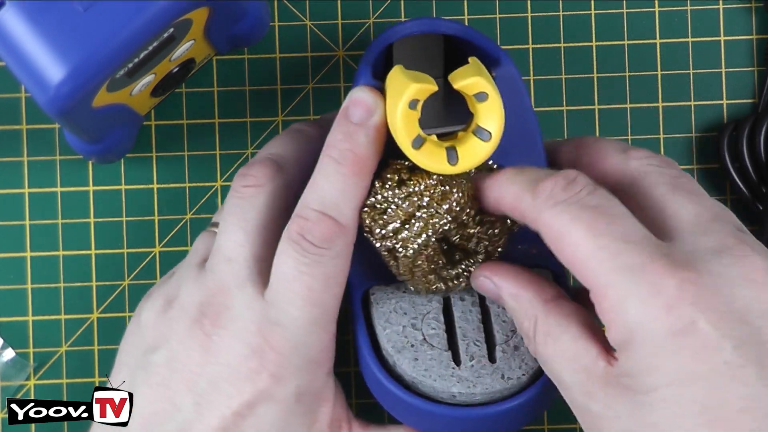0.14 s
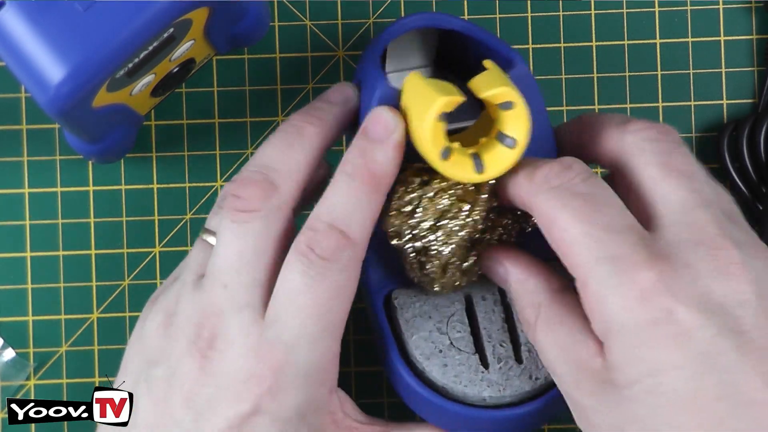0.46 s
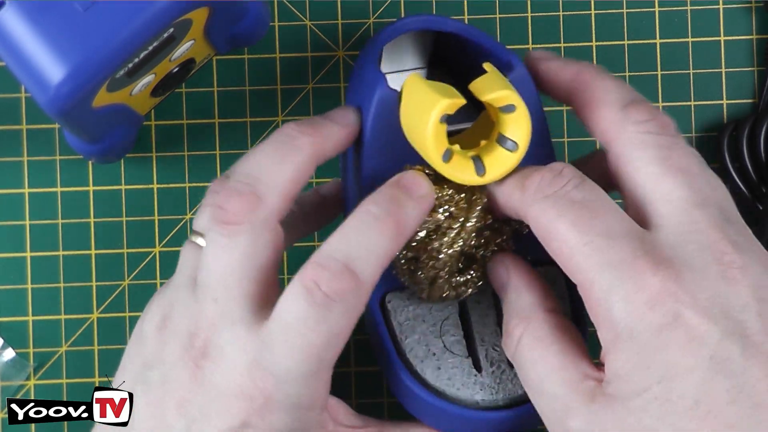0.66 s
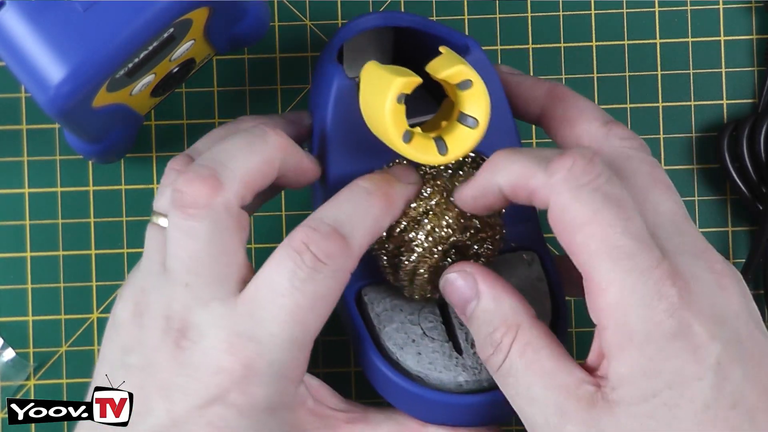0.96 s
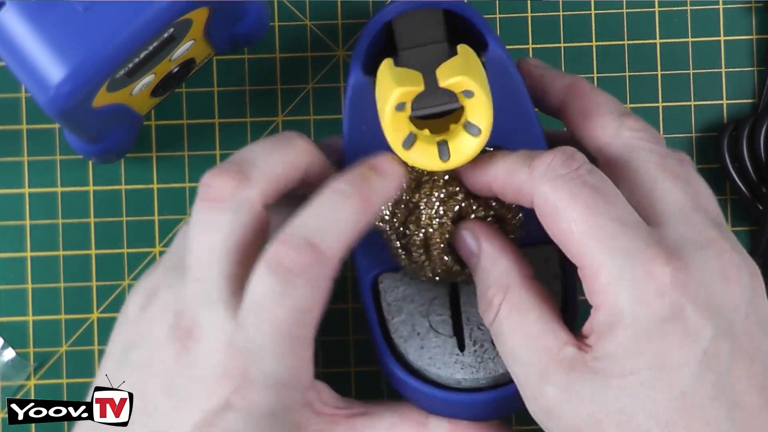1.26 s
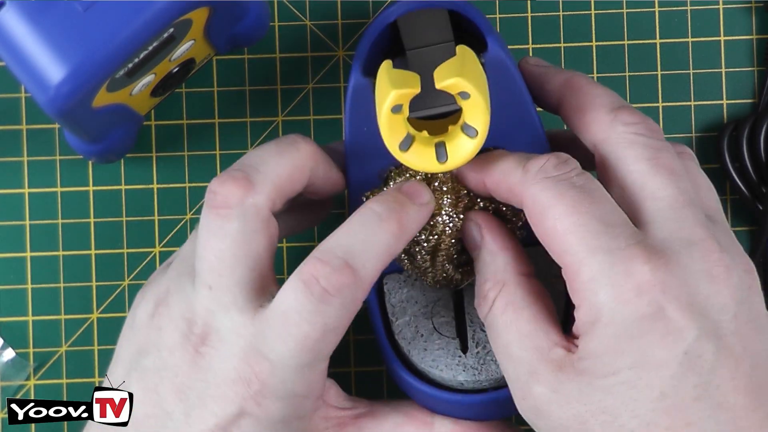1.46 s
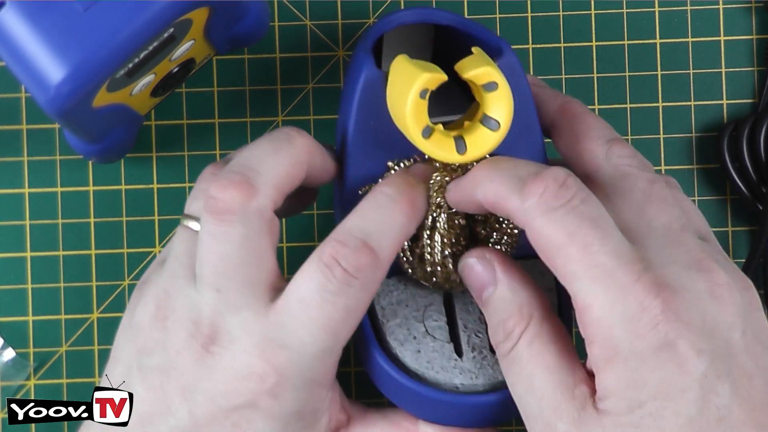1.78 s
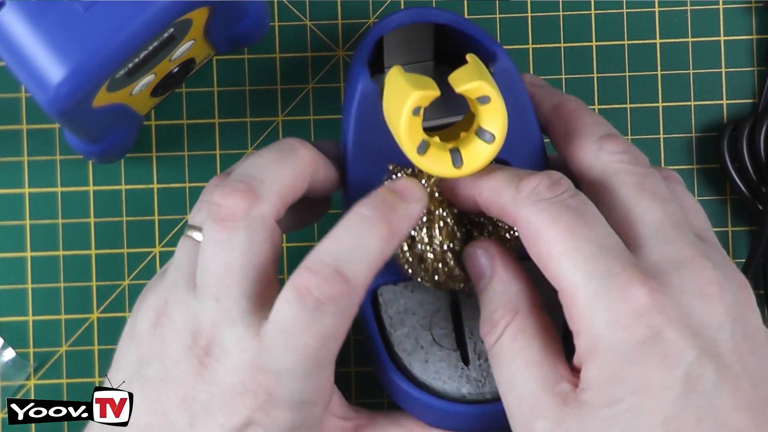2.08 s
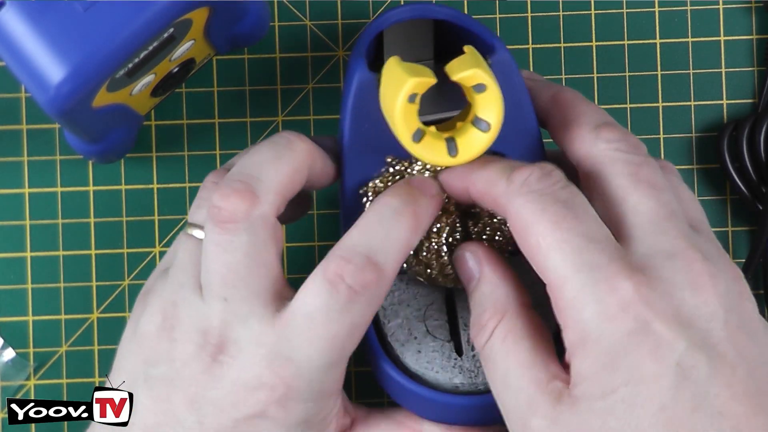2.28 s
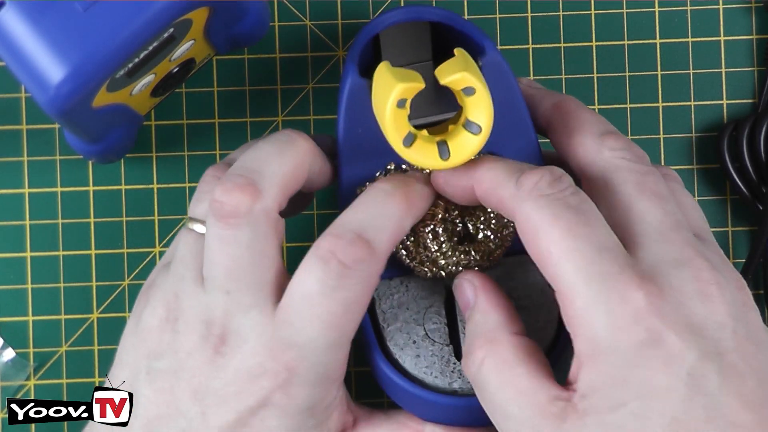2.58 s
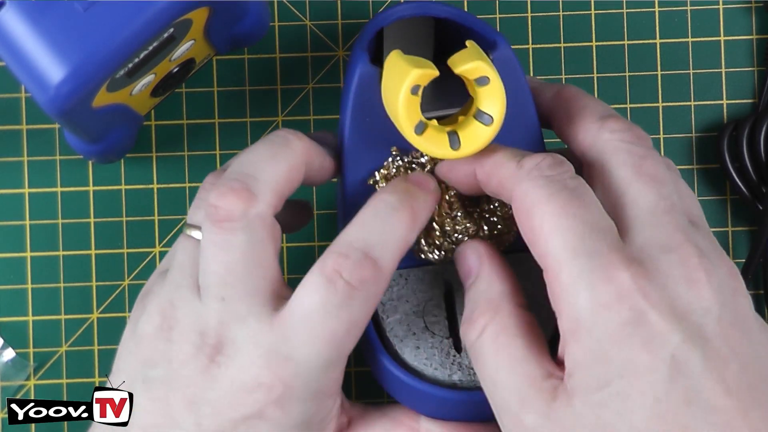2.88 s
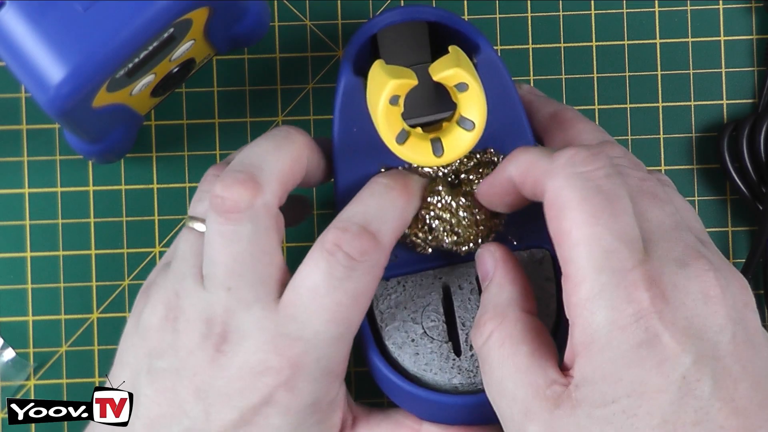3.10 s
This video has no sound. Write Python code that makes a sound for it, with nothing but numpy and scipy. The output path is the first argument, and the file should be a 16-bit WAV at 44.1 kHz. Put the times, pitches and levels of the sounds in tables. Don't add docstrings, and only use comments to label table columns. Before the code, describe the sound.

Scratchy, crackling wire wool pushed into a holder, with small snaps, soft knocks and low bench rumble

```python
import sys
import numpy as np
from scipy import signal
from scipy.fft import rfft, irfft
from scipy.io import wavfile
from scipy.ndimage import uniform_filter1d

SR = 44100
rng = np.random.default_rng(int(sys.argv[2]) if len(sys.argv) > 2 else 0)


def wav_record(signal):
    frames = np.transpose(np.atleast_2d(signal))
    bounded = np.clip(frames, -1, 1)
    quanta = np.round(bounded * 32767).astype(np.int16)
    wavfile.write(sys.argv[1], SR, quanta)


def boost_factor(decibels):
    exponent = np.asarray(decibels, float) / 20
    return 10 ** exponent


N = 143325


def unit(x):
    return x / np.sqrt(np.mean(x ** 2))


def ring(x, hz, width_hz):
    return signal.lfilter(*signal.iirpeak(min(hz, .45 * SR), hz / width_hz, fs=SR), x)


def highpass(hz):
    return signal.butter(2, hz, "high", fs=SR, output="sos")


def colour(x, table):
    hz, db = np.array(table, float).T
    grid_hz = np.arange(4097) * SR / 8192
    db = np.interp(np.log(grid_hz + 1), np.log(hz), np.maximum(db, -90))
    cepstrum = irfft(db * np.log(10) / 20)
    cepstrum[1:4096] *= 2
    cepstrum[4097:] = 0
    impulse = irfft(np.exp(rfft(cepstrum)))[:4096]
    return signal.fftconvolve(x, impulse)[:N]


def walk(rate_hz):
    k = int(SR / rate_hz)
    steps = np.clip(rng.standard_normal(N // k + 3), -1.6, 1.6)
    smooth = uniform_filter1d(uniform_filter1d(np.repeat(steps, k), k), k)
    return 1.4 * smooth[k:N + k]


def swells(table):
    t, power = np.arange(N) / SR, 0
    for at, rise, fall, db in table:
        width = np.where(t < at, rise, fall)
        power = power + boost_factor(db) ** 2 * np.exp(-((t - at) / width) ** 2 * 2)
    return np.sqrt(power)


def ticks(rate_hz, spread_db):
    pick, size, sign = rng.random(N), rng.exponential(size=N), rng.standard_normal(N)
    return unit((pick < rate_hz / SR) * boost_factor(spread_db * size) * sign)


def body(x, mode_hz, modes, wander_db, rate_hz):
    out = 0
    for k, (hz, (width_hz, db)) in enumerate(zip(mode_hz, modes)):
        drive = x * boost_factor(db + wander_db * walk(rate_hz))
        out = out + (-1) ** k * ring(drive, hz, width_hz) / np.sqrt(width_hz)
    return out


def wool():
    # peak in seconds, rise in seconds, fall in seconds, level in dB.
    squeezes = [(.03, 0.021, 0.018, -65), (.18, 0.011, 0.062, -64.5), (.32, 0.078, 0.09, -43),
                (.47, 0.078, 0.036, -48.5), (.65, 0.15, 0.05, -55), (.83, 0.098, 0.082, -54),
                (.915, 0.079, 0.064, -52.5), (1.095, 0.022, 0.03, -45), (1.235, 0.02, 0.082, -40.5),
                (1.285, 0.015, 0.02, -43.5), (1.33, 0.023, 0.022, -36.5), (1.42, 0.012, 0.01, -47.5),
                (1.46, 0.024, 0.053, -51), (1.6, 0.036, 0.12, -50), (1.7, 0.026, 0.026, -47),
                (1.915, 0.016, 0.036, -46.5), (1.98, 0.038, 0.022, -53.5), (2.065, 0.077, 0.039, -46.5),
                (2.19, 0.061, 0.011, -46.5), (2.24, 0.04, 0.059, -46.5), (2.38, 0.041, 0.044, -47.5),
                (2.44, 0.038, 0.036, -43.5), (2.54, 0.025, 0.044, -46.5), (2.67, 0.054, 0.025, -48),
                (2.695, 0.0088, 0.012, -40.5), (2.721, 0.018, 0.019, -37), (2.92, 0.05, 0.032, -55.5),
                (2.98, 0.02, 0.025, -43.5), (3.035, 0.057, 0.058, -41), (3.18, 0.032, 0.073, -50.5),
                (3.235, 0.02, 0.047, -45)]
    # frequency in Hz, density in dB per Hz.
    wire_colour = [(450, -40), (800, -6.5), (1800, 2), (3300, -7.5), (7500, -1.5), (9800, -11),
                   (11500, -3.5), (16000, -4)]
    cup_hz = [1710, 2085, 2330, 2725, 4135, 3960, 5510, 6300, 7100, 7850, 8230, 9150, 10800, 12300]
    # width in Hz, level in dB.
    cup_modes = [(60, -12.5), (32, -8), (50, -14.5), (40, -6), (50, -2.5), (60, -10), (45, -5), (60, -6),
                 (50, -4), (90, -15), (80, -9), (70, -6), (50, -7), (80, -11)]
    cup_db, cup_wander_db, coils_db, rest_db = -1, 4, -17.5, -62.5

    slips = ticks(9000, 1.9) * boost_factor(1.8 * walk(70))
    effort = np.hypot(swells(squeezes), boost_factor(rest_db))
    drive = slips * effort
    cracks = wire_snaps()
    wire_gain = np.std(colour(slips, wire_colour))
    cup = body(drive + 0.3 * cracks, cup_hz, cup_modes, cup_wander_db, 16)
    wire_drive = drive + boost_factor(coils_db) * 40 * coils(drive + 0.13 * cracks)
    wires = patchy(colour(wire_drive, wire_colour)) / wire_gain
    sound = outer_wires(wires + 0.42 * cracks + boost_factor(cup_db) * 45 * cup)
    return sound + press_thud(slips * np.sqrt(effort) * boost_factor(-23.5))


def wire_snaps():
    # start in seconds, peak in dB, brightness in Hz.
    snaps = [(0.235, -32, 7000), (0.5524, -39, 7000), (.872, -32, 9000), (0.976, -25, 8300),
             (1.0899, -29, 10000), (1.2206, -34, 4100), (1.24, -23, 7000), (1.5724, -34, 4000),
             (1.911, -39, 6000), (2.1155, -29, 7500), (2.367, -34, 7000), (2.7667, -38, 7000),
             (2.786, -36, 7300), (2.7983, -30, 7300), (2.8747, -28.5, 7100), (2.948, -34, 7250),
             (2.9682, -33, 4520), (3.129, -19.5, 3820), (3.2225, -31, 5440)]
    rebound_s, rebound_db, tail_s, tail_db = 0.0016, 0.5, 0.0039, -8
    cracks, t = np.zeros(N), np.arange(2000) / SR
    late = np.maximum(t - rebound_s, 0)
    shape = np.exp(-t / 0.0017)
    shape = shape + boost_factor(rebound_db) * (late > 0) * np.exp(-late / 0.00091)
    shape = shape + boost_factor(tail_db) * np.exp(-t / tail_s)
    for at, db, hz in snaps:
        i = int(at * SR)
        noise = rng.standard_normal(2000)
        crack = ring(ring(noise * shape, hz, 0.87 * hz), hz, 2.0015 * hz)
        cracks[i:i + 2000] += (boost_factor(db) * crack)[:N - i]
    return cracks


def coils(x):
    hz = 4500 * 3.3 ** ((np.arange(30) + rng.random(30)) / 30)
    width_hz, wander_db = 160, 7
    return body(x, hz, [(width_hz, 0)] * len(hz), wander_db, 11)


def patchy(x):
    flicker_db, lows = 2.5, [0]
    for edge_hz in [700, 1400, 2500, 4000, 6000, 8500, 11500]:
        lows.append(signal.sosfiltfilt(signal.butter(2, edge_hz, fs=SR, output="sos"), x))
    lows.append(x)
    return sum((b - a) * boost_factor(flicker_db * walk(20.99)) for a, b in zip(lows, lows[1:]))


def outer_wires(x):
    # time in seconds, treble gain in dB.
    treble = [(0, -22), (.15, -8), (.5, -2.5), (.95, 0.5), (1.18, 0.5), (1.31, -17), (1.5, -1.5),
              (1.85, -3), (2.05, -2.5), (3.1, -3.5), (3.25, -2)]
    top = signal.sosfiltfilt(highpass(9000), x)
    gain_db = np.interp(np.arange(N) / SR, *np.array(treble).T)
    return x + top * (boost_factor(gain_db) - 1)


def press_thud(push):
    low_hz, thud_db = 104.3, 3.5
    low = ring(ring(push, low_hz, 34.6), low_hz, 57)
    high = ring(ring(push, 166.2, 37), 159.4, 49)
    return boost_factor(thud_db) * (15 * low + 9 * high)


def scratch_rings(table):
    narrowest_hz, blur, fade = 37, 1.6, 1.05
    out, t = np.zeros(N + 6000), np.arange(6000) / SR
    for at, length, hz, db in table:
        width_hz = narrowest_hz + blur / length
        noise = rng.standard_normal(6000) * np.exp(-fade * t / length - (t / length) ** 4)
        burst = ring(ring(noise, hz, width_hz), hz, 2 * width_hz)
        out[int(at * SR):][:6000] += boost_factor(db) * burst * np.sqrt(SR / width_hz / np.pi)
    return out[:N]


def catches_and_jolts():
    # start in seconds, length in seconds, frequency in Hz, level in dB.
    caught = [(1.8275, 0.0048, 1000, -45), (3.02, .07, 1150, -47), (0.189, .01, 7650, -53),
              (0.27, .02, 4200, -51), (.283, 0.045, 1840, -48), (.328, .02, 4100, -42),
              (0.33, 0.0086, 7099, -42), (.335, .04, 7800, -45), (1.567, 0.005, 1290, -46.5),
              (0.459, .018, 4135, -50), (.465, 0.013, 12000, -56.5), (0.55, 0.014, 7240, -51),
              (1.275, 0.065, 673, -35), (0.87, .008, 7150, -50), (0.974, 0.023, 10580, -45.5),
              (1.088, .03, 10700, -43), (1.131, 0.051, 5560, -52), (1.124, 0.056, 2740, -56.5),
              (1.2195, 0.015, 4200, -37), (1.2396, 0.011, 7120, -42.5), (1.241, .01, 8000, -43),
              (1.26, 0.087, 2745, -43), (1.262, 0.053, 908, -31.5), (1.268, 0.041, 5930, -45),
              (1.314, 0.031, 6350, -37), (1.336, .024, 4080, -38), (1.328, 0.041, 1710, -39.5),
              (1.4107, 0.011, 7100, -53), (1.4416, .012, 7200, -49), (1.592, 0.029, 7100, -48.5),
              (1.637, 0.023, 4120, -47), (1.9679, .015, 4170, -48), (2.1146, .011, 4200, -39),
              (1.922, 0.017, 6300, -57), (2.02, 0.03, 7630, -48), (2.3665, .012, 6960, -45),
              (2.369, 0.048, 2030, -61), (2.6469, .008, 7710, -46), (2.6893, 0.017, 4130, -46.5),
              (2.717, 0.012, 7100, -34.5), (2.713, 0.018, 2610, -43.5), (2.7841, .006, 7150, -40),
              (2.796, .006, 7220, -43.5), (2.874, 0.0059, 7100, -40), (2.9487, .006, 7100, -45),
              (2.9682, .01, 4020, -39.5), (3.0, 0.028, 7050, -45), (3.189, 0.03, 4080, -48.5),
              (3.198, 0.046, 12200, -52), (3.195, 0.046, 10870, -53)]
    return scratch_rings(caught)


def holder():
    # peak in seconds, rise in seconds, fall in seconds, level in dB.
    drags = [(.11, 0.013, 0.042, -58.5), (.3, 0.086, 0.034, -46.5), (.365, 0.045, 0.076, -44),
             (.53, 0.081, 0.03, -39.5), (.68, 0.049, 0.056, -48.5), (.78, 0.038, 0.03, -43),
             (.83, 0.029, 0.047, -28.5), (.9, 0.027, 0.031, -35.5), (.985, 0.013, 0.015, -42.5),
             (1.095, 0.014, 0.049, -44), (1.226, 0.0047, 0.017, -29), (1.248, 0.016, 0.025, -25),
             (1.28, 0.011, 0.038, -28), (1.32, 0.081, 0.031, -30), (1.46, 0.1, 0.024, -53.5),
             (1.582, 0.013, 0.022, -36), (1.62, 0.042, 0.039, -31.5), (1.715, 0.045, 0.037, -33),
             (1.805, 0.022, 0.014, -40), (1.92, 0.035, 0.032, -44), (2.04, 0.036, 0.043, -45.5),
             (2.11, .03, .03, -45), (2.45, 0.15, 0.3, -52.5), (2.71, 0.032, 0.045, -42.5),
             (2.89, 0.034, 0.034, -54.5), (3.05, 0.065, 0.054, -44.5), (3.19, 0.081, 0.053, -50)]
    bench_hz = [168, 210, 276, 348, 424, 480, 532, 655, 815, 928, 1009, 1250, 1750, 2210]
    # width in Hz, level in dB.
    bench_modes = [(17, -4), (20, 3), (28, -8), (29, -2), (29, -4), (35, -8), (32, -8), (36, -10),
                   (54, -16), (59, -12), (43, -14), (200, -14), (500, -18), (60, -21)]
    bench_wander_db, scrape_hz, scrape_db = 1.17, 3060, -18.5
    drive = ticks(3000, 1.0) * boost_factor(1.3 * walk(50)) * swells(drags)
    drum = body(drive, bench_hz, bench_modes, bench_wander_db, 9.98)
    scrape = ring(ring(drive, scrape_hz, 3400), scrape_hz, 4400)
    return 70 * signal.sosfilt(highpass(150), drum) + boost_factor(scrape_db) * scrape


def shell_taps():
    # start in seconds, frequency in Hz, level in dB.
    taps = [
        (.14, 1960, -48.5),
        (1.089, 1010, -38.5),
        (1.785, 1300, -44),
        (1.826, 885, -50),
        (1.911, 1720, -35.5),
    ]
    t60_s, out, t = 0.062, np.zeros(N), np.arange(N) / SR
    for at, hz, db in taps:
        u = np.maximum(t - at, 0)
        knock = (1 - np.exp(-u / 0.0022)) * boost_factor(-60 * u / t60_s) * rng.standard_normal(N)
        out = out + boost_factor(db) * 7 * ring(knock, hz, .16 * hz)
    return out


def bench_jolts():
    # start in seconds, length in seconds, frequency in Hz, level in dB.
    jolts = [
        (.975, 0.023, 125, -36),
        (1.1, 0.07, 165, -46.5),
        (1.79, .035, 190, -36),
        (2.225, 0.032, 335, -48),
    ]
    return scratch_rings(jolts)


def bench_wobble():
    # peak in seconds, rise in seconds, fall in seconds, level in dB.
    rocking = [(.15, 0.043, 0.085, -40.5), (.33, 0.067, 0.045, -35.5), (.5, 0.12, 0.056, -36),
               (.9, 0.23, 0.11, -36), (1.23, 0.096, 0.096, -29), (1.41, 0.046, 0.042, -34.5),
               (1.78, 0.18, 0.13, -31), (2.03, 0.14, 0.22, -28.5), (2.5, 0.11, 0.13, -34),
               (2.82, 0.18, 0.16, -28), (3.1, 0.12, 0.12, -39)]
    wobble_hz = 25.2 * (1 + 0.0402 * walk(2.5))
    phase = 2 * np.pi * np.cumsum(wobble_hz) / SR
    return np.sqrt(2) * swells(rocking) * np.sin(phase)


def low_hum():
    hum_hz, hum_db = 90.6, -53
    phase = 2 * np.pi * hum_hz * np.arange(N) / SR + 0.19 * walk(5.97)
    return np.sqrt(2) * boost_factor(hum_db + 1.4 * walk(11)) * np.sin(phase)


def room_hiss():
    # frequency in Hz, density in dB per Hz.
    hiss_colour = [(24, -6.5), (40, -3), (491, -27.5), (615, -39.5), (1520, -29.5), (3740, -47.5),
                   (4130, -53), (14100, -49), (16000, -56)]
    return boost_factor(-50.5) * unit(colour(rng.standard_normal(N), hiss_colour))


def room_echo(near):
    echo_db, t60_s, t = -7, 0.22, np.arange(8000) / SR
    tail = rng.standard_normal(8000) * boost_factor(-60 * t / t60_s) * (t > .003)
    bright = signal.lfilter(*signal.butter(2, 450, "high", fs=SR), near)
    return boost_factor(echo_db) * signal.fftconvolve(bright, tail / np.linalg.norm(tail))[:N]


def scene():
    near = wool() + catches_and_jolts() + holder() + shell_taps()
    bench = bench_jolts() + bench_wobble()
    return (near + room_echo(near) + bench + low_hum() + room_hiss())[None]


def band_limit(x):
    return signal.sosfilt(signal.butter(12, 16240, fs=SR, output="sos"), x)


def record(dry):
    top_hz = 15800
    mix = signal.sosfilt(signal.ellip(10, .3, 70, top_hz, fs=SR, output="sos"), dry)
    return band_limit(mix)


dry = scene()
out = record(dry)
wav_record(out)
```